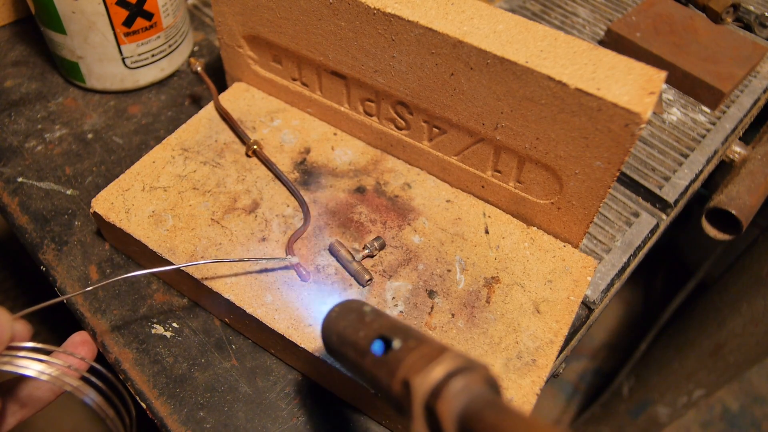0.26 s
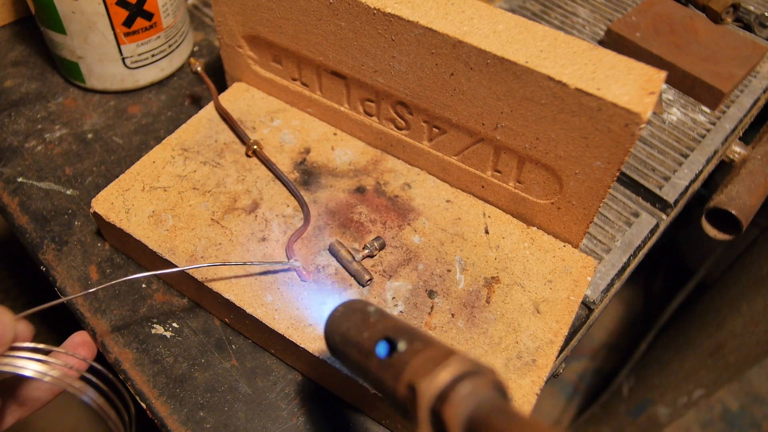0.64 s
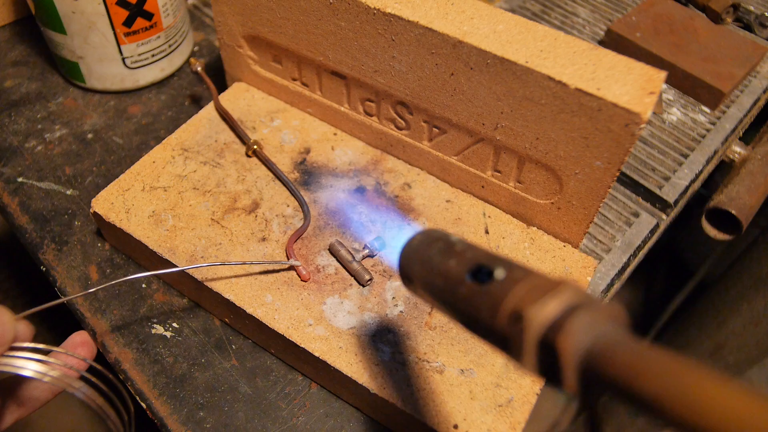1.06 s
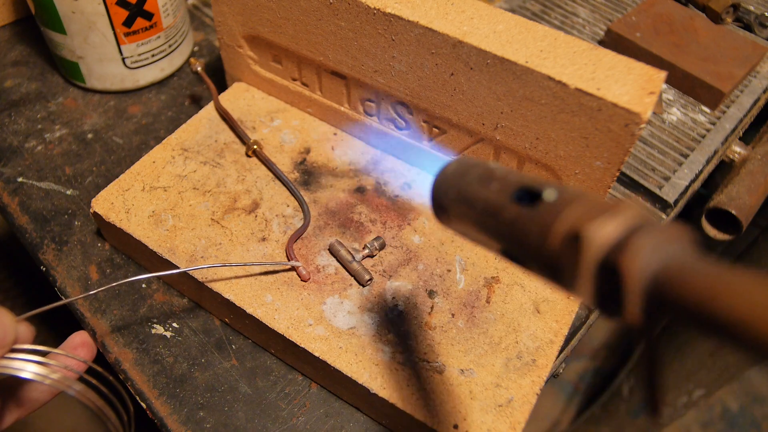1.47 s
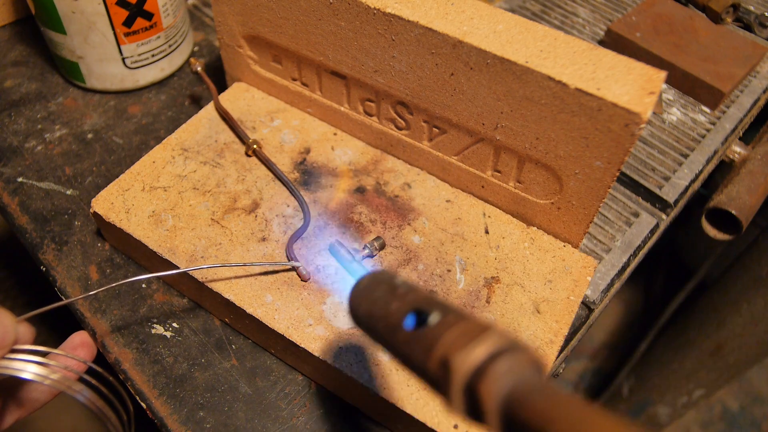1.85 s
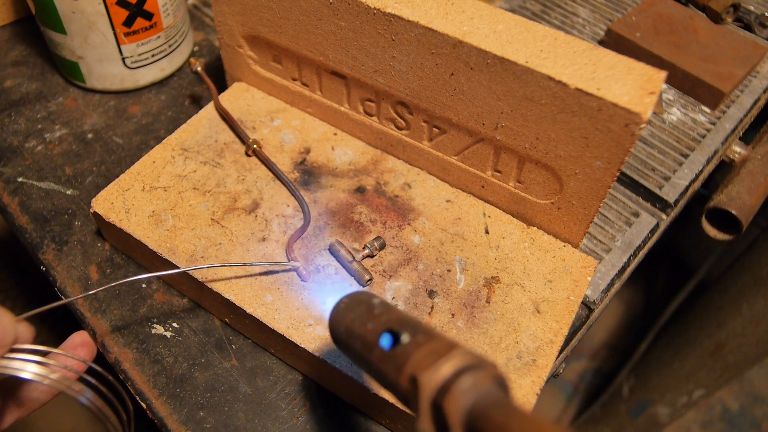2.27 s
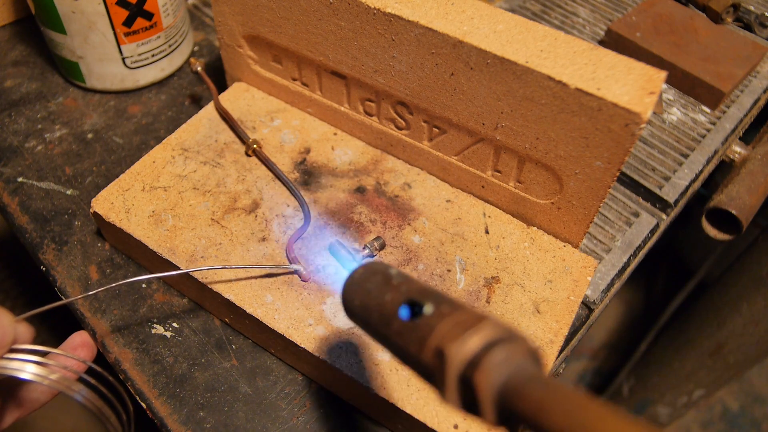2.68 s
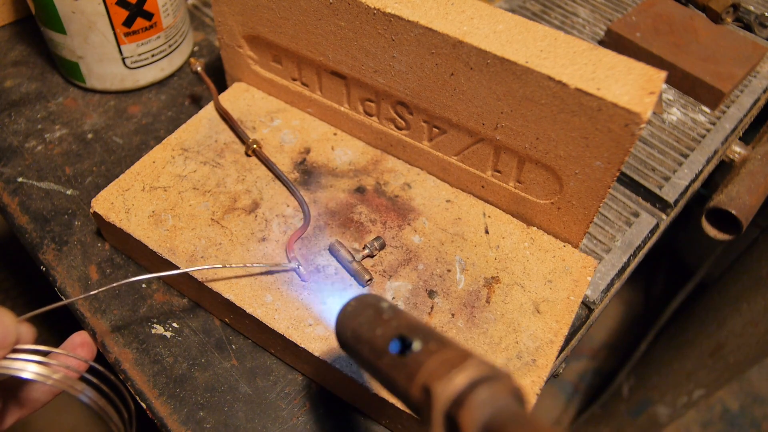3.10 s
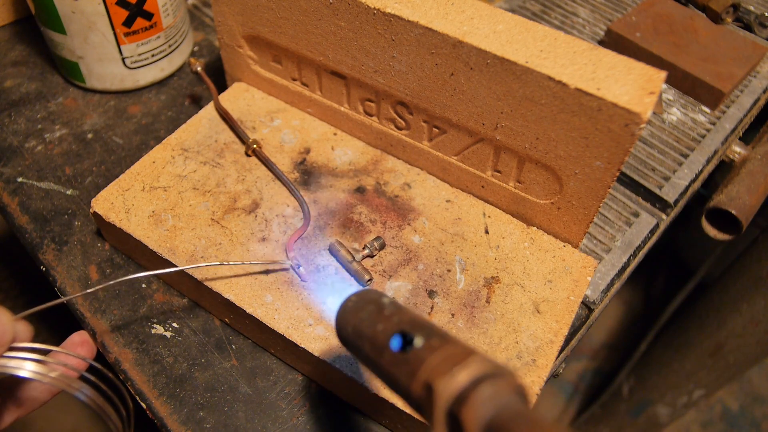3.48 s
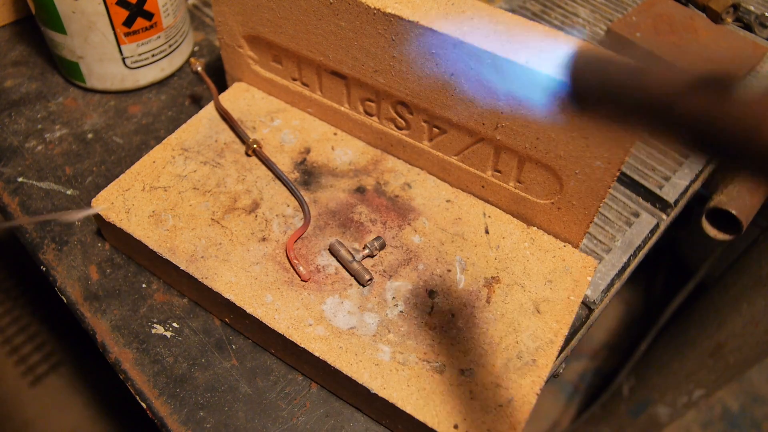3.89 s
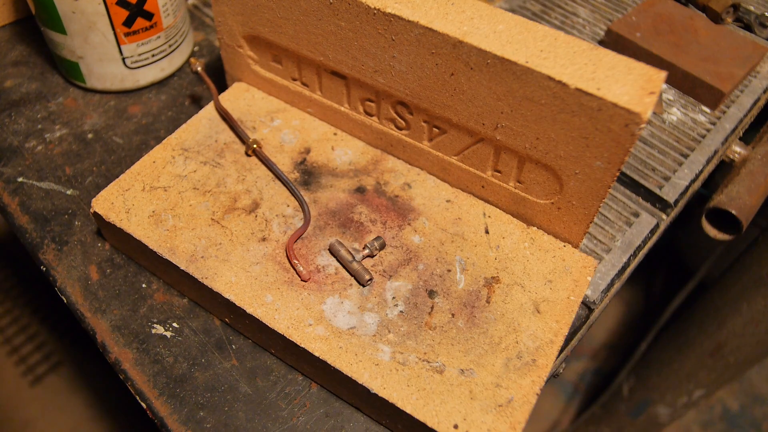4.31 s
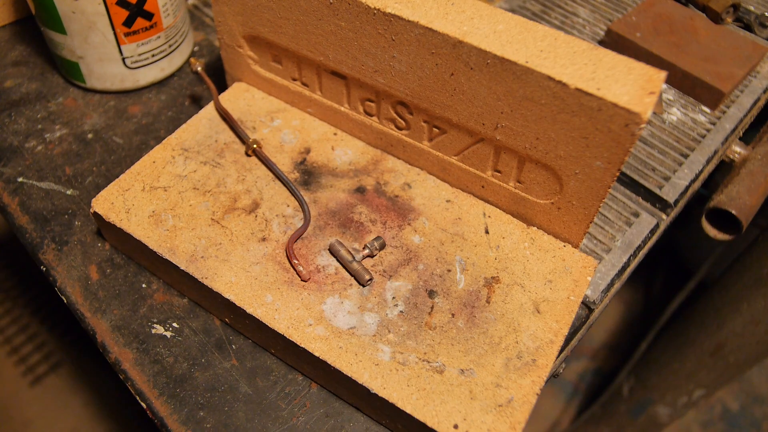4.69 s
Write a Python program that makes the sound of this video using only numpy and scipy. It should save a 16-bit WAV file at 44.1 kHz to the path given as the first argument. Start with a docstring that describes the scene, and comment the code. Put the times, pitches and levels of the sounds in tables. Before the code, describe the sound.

A small gas torch roars steadily and hoarsely at close range, shifts colour in one sweep, then whooshes away and fades.

```python
"""A close, rough roar: a propane torch burns on a small metal joint lying between two firebricks.
The flame is noise, coloured by burner and brick resonances and levelled in three bands: roar, rasp, hiss.
It is lifted once, brought back, then carried away; short echoes sweep its colour as it moves.
The gas jet, a band of uneven noise, hisses thinly behind; the workshop adds faint reverb and rumble."""
import sys
import numpy as np
from scipy import signal
from scipy.fft import rfft, irfft, next_fast_len
from scipy.io import wavfile
from scipy.ndimage import map_coordinates

SR = 44100
rng = np.random.default_rng(int(sys.argv[2]) if len(sys.argv) > 2 else 0)


def dump_mix(stems):
    """Bounce the given channels to the path in sys.argv[1] as a 16-bit WAV at rate SR."""
    frames = np.atleast_2d(stems).T  # one column per channel
    limited = np.clip(frames, -1, 1)  # hard clip at full scale
    pcm = np.round(limited * 32767).astype(np.int16)
    wavfile.write(sys.argv[1], SR, pcm)


N = 213836
TOP_HZ = 15700  # upper band limit of the gas jet and of the output


def amp(db):
    """Decibels to gain."""
    return 10 ** (np.asarray(db) / 20)


def unit(x):
    """x at rms 1."""
    return x / np.sqrt(np.mean(x ** 2) + 1e-20)


def blend(a, b, share):
    """a at share 0, b at share 1."""
    return a + (b - a) * share


def ramp(x, start, end):
    """0 below start, rising to 1 at end."""
    return np.clip((x - start) / (end - start), 0, 1)


def swell(t, centre_s, spread_s):
    """Gaussian rise and fall, peak 1, down to 1/e at spread_s either side."""
    return np.exp(-((t - centre_s) / spread_s) ** 2)


def bell(hz, centre_hz, half_width_hz, db):
    """A resonance's lift (or a hollow's cut) in dB."""
    return db / (1 + ((hz - centre_hz) / half_width_hz) ** 2)


def along(points, hz):
    """(Hz, value) points read on a log frequency axis."""
    point_hz, value = np.transpose(points)
    return np.interp(np.log(hz + 1), np.log(point_hz), value)


def wobble(knots_per_s):
    """A smooth random curve through normally distributed knots."""
    knots = rng.standard_normal(int(N * knots_per_s / SR) + 4)
    return map_coordinates(knots, [np.arange(N) * knots_per_s / SR])


def filtered(x, response):
    """x times a response of frequency."""
    size = next_fast_len(N + SR // 2)
    hz = np.fft.rfftfreq(size, 1 / SR)
    return irfft(rfft(x, size) * response(hz), size)[:N]


def turbulence(flutter_db, flutter_per_s, sputter_db, sputter_per_s):
    """Turbulent flow: white noise whose strength wavers slowly (flutter) and quickly (sputter)."""
    level_db = flutter_db * wobble(flutter_per_s) + sputter_db * wobble(sputter_per_s)
    return unit(rng.standard_normal(N) * amp(level_db))


def pose(t):
    """The torch's motion: height and setback in cm, shares clear of the joint and turned away (0-1)."""
    # one motion drives echoes and colour: time_s, height_over_flat_brick_cm, setback_from_joint_cm
    path = [(0.055, 0.5, 1.71), (0.215, 0.57, 0.54), (0.77, 0.46, 0.76), (0.894, 0.72, 2.31),
            (1.309, 2.56, 3.74), (1.394, 4.66, 4.72), (1.629, 6.52, 5.29), (1.806, 3.36, 4.84),
            (1.902, 1.75, 3.12), (2.133, 0.02, 0.98), (2.553, 0.11, 0.9), (2.758, 0.83, 2.96),
            (3.066, 0.55, 1.56), (3.647, 0.63, 1.76), (3.832, 1.32, 4.2), (3.888, 3.77, 5.6),
            (3.979, 6.96, 7.95), (4.074, 9.07, 10.62), (4.173, 9.14, 13.7), (4.304, 8.82, 14.38),
            (4.408, 10.9, 16.67), (4.549, 12.3, 18.96), (4.722, 15.58, 20.94), (4.83, 16.72, 26.53)]
    time_s, path_height_cm, path_back_cm = np.transpose(path)
    height_cm = np.interp(t, time_s, path_height_cm)
    back_cm = np.interp(t, time_s, path_back_cm)
    clear = ramp(height_cm, start=0.5, end=2.33)
    away = ramp(back_cm, start=0.54, end=17)
    return height_cm, back_cm, clear, away


def room_rumble(level_db, corner_hz):
    """The workshop's faint low background: low-passed noise."""
    noise = rng.standard_normal(N)
    return amp(level_db) * unit(filtered(noise, lambda hz: 1 / (1 + (hz / corner_hz) ** 2)))


def workshop(x):
    """The room's answer: a noise tail in which each frequency dies at its own speed."""
    # reverberation: freq_hz, t60_s
    decay = [(200, 0.3), (2000, 0.6), (10000, 0.17)]
    hz, t, z = signal.stft(rng.standard_normal(SR // 2), SR, nperseg=256)
    t60_s = along(decay, hz)[:, None]
    tail = signal.istft(z * amp(-60 * t / t60_s), SR, nperseg=256)[1]
    return signal.fftconvolve(x, tail / np.linalg.norm(tail))[:N]


def gas_jet(on_joint_db, away_rise_db):
    """Propane leaves the orifice with a thin, uneven hiss, plainer once the burner turns away."""
    # spectral shape at the orifice, relative: freq_hz, density_db
    jet_shape = [(6000, -31), (10000, -11), (11400, -8), (12200, 4), (13200, -13), (14000, -8),
                 (15600, -22)]
    gas = turbulence(flutter_db=2.0, flutter_per_s=40, sputter_db=1.5, sputter_per_s=250)
    hiss = unit(filtered(gas, lambda hz: amp(along(jet_shape, hz)) * (hz < TOP_HZ)))
    *_, away = pose(np.arange(N) / SR)
    return amp(on_joint_db + away_rise_db * away) * hiss


def bench_clutter(hz, back_cm, level_db, first_ms, last_ms, max_ms_per_cm, corner_hz, count):
    """Tools and tins scatter the treble: faint echoes whose ripples slide down as the torch draws back."""
    khz = hz / 1000
    echoes = 0
    for place, angle, sign in rng.random((count, 3)):
        ms_per_cm = max_ms_per_cm * (1 + angle) / 2
        delay_ms = blend(first_ms, last_ms, place) + ms_per_cm * back_cm
        echoes = echoes + np.sign(sign - .5) * np.exp(-2j * np.pi * khz * delay_ms)
    high_pass = hz / np.hypot(hz, corner_hz)
    return amp(level_db) / np.sqrt(count) * echoes * high_pass


def brick_comb(hz, height_cm, back_cm, clear, away):
    """Direct sound plus echoes delayed by height and setback; the flame's length blurs their treble."""
    # echoes off bricks, burner and bench: delay_ms, height_ms_per_cm, setback_ms_per_cm,
    # gain_on_joint, gain_clear, gain_away, blur_corner_hz
    reflections = [(0.118, 0.0008, 0.0006, -0.18, 0.41, -0.52, 68296),
                   (0.162, 0.0, 0.0589, -0.32, 0.45, 0.09, 2866),
                   (0.193, 0.0429, 0.0063, 0.092, -0.05, 0.11, 35164),
                   (0.223, 0.04, 0.02, 0.23, -0.19, 0.05, 4491),
                   (0.34, 0.0049, 0.049, 0.12, 0.12, -0.22, 3352),
                   (0.446, 0, 0.048, -0.32, -0.43, 0.09, 3150),
                   (0.518, 0.0221, 0.0115, -0.095, 0.17, -0.06, 15398),
                   (0.609, 0.013, 0.04, -0.18, -0.1, -0.064, 9854),
                   (0.761, 0.011, 0.037, 0.12, 0.12, -0.04, 10323),
                   (1.058, 0.0, 0.0, -0.054, -0.15, 0.19, 7482),
                   (1.121, 0.0015, 0.02, 0.28, 0.24, 0.15, 1610),
                   (1.44, 0.0035, 0.013, 0.078, 0.057, 0.1, 7759),
                   (1.508, 0.035, 0.032, -0.018, 0.069, 0.033, 2185),
                   (1.589, 0.0, 0.0087, 0.056, 0.19, 0.13, 1839),
                   (2.467, 0.0, 0.0653, 0.00062, 0.099, -0.07, 3796)]
    khz = hz / 1000
    comb = 1
    for ms, ms_per_cm_up, ms_per_cm_back, on_joint, when_clear, when_away, blur_hz in reflections:
        gain = blend(on_joint, blend(when_clear, when_away, away), clear)
        blur = 1 / np.hypot(1, hz / blur_hz)
        delay_ms = ms + ms_per_cm_up * height_cm + ms_per_cm_back * back_cm
        comb = comb + gain * blur * np.exp(-2j * np.pi * khz * delay_ms)
    return comb


def whooshes(hz, t):
    """Bright and hollow bands in dB that come, glide and go as the flame swings past the bricks."""
    # centre_s, spread_s, centre_hz, glide_hz_per_s, half_width_hz, peak_db
    glides = [(1.149, 0.137, 4911, -633, 181, -9.5), (1.275, 0.329, 10500, -3467, 178, -10),
              (1.51, 0.4, 5530, -198, 141, -12), (1.601, 0.18, 3550, -160, 143, -14),
              (1.664, 0.18, 6540, 453, 299, 7.2), (3.907, 0.073, 5210, -11864, 154, -11),
              (3.99, 0.093, 3420, -1646, 239, -14), (4.068, 0.145, 1496, -3109, 2237, 14.5),
              (4.08, 0.15, 6980, -2367, 340, 10.5), (4.1, 0.13, 1040, -900, 70, -4),
              (4.136, 0.12, 3694, -2912, 192, 6.5), (4.326, 0.34, 5480, -1549, 88, 5),
              (4.377, 0.23, 2467, -965, 107, -10), (4.44, 0.22, 4040, -1700, 125, 9)]
    return sum(bell(hz, centre_hz + glide_hz_per_s * (t - s), half_width_hz, db) * swell(t, s, spread_s)
               for s, spread_s, centre_hz, glide_hz_per_s, half_width_hz, db in glides)


def burn_levels(t):
    """Roar, rasp and hiss in dB: they hold, swell or dip in passing and fade as the torch is carried off."""
    # rows roar, rasp, hiss: level_db, fade_start_s, fade_db_per_s
    bands = [(-43, 3.89, 11.5), (-49, 4.065, 18), (-54.5, 4.09, 16)]
    # flame playing over the bricks: centre_s, spread_s, roar_db, rasp_db, hiss_db
    swells = [(0.711, 0.42, 1.0, 1.0, 1.5), (1.022, 0.063, -2.5, 0, -4.5), (1.56, 0.25, -1.1, 1.2, 0),
              (3.852, 0.38, 0.1, 3, 0.5), (4.075, 0.073, -1.3, -0.3, 5.5), (4.307, 0.038, 1.8, 3, 2),
              (4.609, 0.065, -3.5, -6, -6), (4.67, 0.036, 5, 5, 4.5)]
    held_db = np.array([db - fade_db_per_s * np.maximum(t - start_s, 0)
                        for db, start_s, fade_db_per_s in bands])
    return held_db + sum(np.outer(dbs, swell(t, s, spread_s)) for s, spread_s, *dbs in swells)


def flame():
    """Turbulence rings the burner and the brick corner; the torch's pose colours it."""
    # spectral shape on the joint, relative: freq_hz, density_db
    joint_shape = [(175, -4), (283, 6.5), (545, -8), (890, -4.5), (1102, -20.5), (1938, -9), (3403, -17.5),
                   (5229, -17.5), (5918, -26), (7165, -28.5), (7797, -40.5), (9812, -38), (11351, -45),
                   (15802, -50)]
    # burner tube and brick corner: centre_hz, half_width_hz, peak_db
    resonances = [(361, 27, 3), (627, 23, 3.5), (779, 69, 3.7), (985, 53, 3), (1140, 50, -3),
                  (1290, 215, 11.5), (2398, 195, 11.5), (3050, 80, 7.5), (3870, 35, 8), (4182, 126, 7),
                  (4870, 104, 2.1), (6180, 133, 3), (7120, 110, 2.5), (8266, 240, 6), (8780, 150, 4.5),
                  (9360, 350, 7), (11422, 252, 4.7)]
    # colour change aimed above the joint: freq_hz, change_db
    lifted_colour = [(268, -1.5), (935, 9.5), (1130, -5), (1915, -3.5), (2756, -0.5), (3440, 11),
                     (4126, -2.5), (4705, 0.5), (5986, 5), (7149, -12), (8527, -3), (11107, 2),
                     (13776, -6.1)]
    # colour change with the burner turned away: freq_hz, change_db
    away_colour = [(197, 6.5), (730, 1), (980, -8.5), (1100, 6.5), (2100, 2.5), (2520, -8), (2838, -2.5),
                   (3876, -9.5), (4059, -6.5), (5430, -9.5), (7200, 7), (8300, -1), (10000, -5), (12392, 3)]

    eddies = turbulence(flutter_db=0.45, flutter_per_s=42, sputter_db=1.34, sputter_per_s=170)
    hz, t, z = signal.stft(eddies, SR, nperseg=1024)
    hz = hz[:, None]
    height_cm, back_cm, clear, away = pose(t)

    body_db = along(joint_shape, hz) + sum(bell(hz, *resonance) for resonance in resonances)
    lifted = clear * blend(0.99, 0.32, away)  # part of the lifted colour remains once turned away
    aim_db = lifted * along(lifted_colour, hz) + away * along(away_colour, hz) + whooshes(hz, t)
    clutter = bench_clutter(hz, back_cm, level_db=-14, first_ms=1.97, last_ms=6.7,
                            max_ms_per_cm=0.064, corner_hz=2210, count=10)
    comb = brick_comb(hz, height_cm, back_cm, clear, away)
    colour = amp(body_db + aim_db) * abs(comb + clutter)

    # large eddies make the low roar, smaller ones the rasp, the finest the hiss
    roar = 1 / (1 + (hz / 1400) ** 10)
    not_hiss = 1 / (1 + (hz / 3300) ** 10)
    gain = 0
    for share, level_db in zip((roar, not_hiss - roar, 1 - not_hiss), burn_levels(t)):
        part = colour * share
        part_rms = np.sqrt(np.mean(part ** 2, axis=0))  # per frame, so level_db sets each band
        gain = gain + amp(level_db) * part / part_rms
    burning = signal.istft(z * gain, SR, nperseg=1024)[1][:N]

    # so small a flame radiates almost no bass
    bass_hz, steepness = 146, 14
    return filtered(burning, lambda f: (1 + (bass_hz / (f + 1)) ** steepness) ** -.5)


def scene():
    """Flame, its reverb, jet and rumble summed at one microphone."""
    background = room_rumble(level_db=-92, corner_hz=90)
    jet = gas_jet(on_joint_db=-87.0, away_rise_db=5.5)
    torch = flame()
    reverb = amp(-17) * workshop(torch)
    return (torch + reverb + jet + background)[None]


def record(dry):
    """The microphone channel, cut off sharply at TOP_HZ."""
    return np.array([filtered(channel, lambda hz: hz < TOP_HZ) for channel in dry])


dry = scene()
out = record(dry)
dump_mix(out)
```